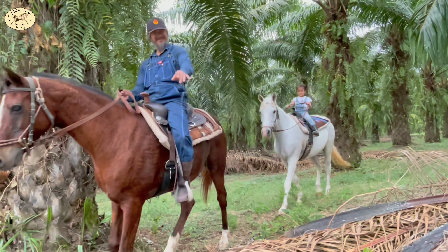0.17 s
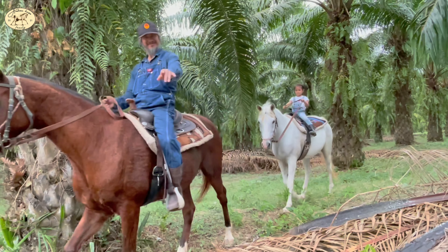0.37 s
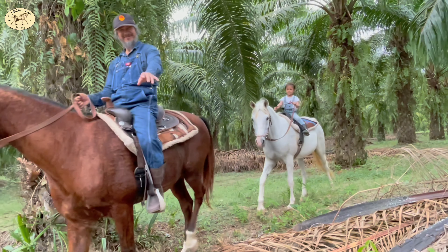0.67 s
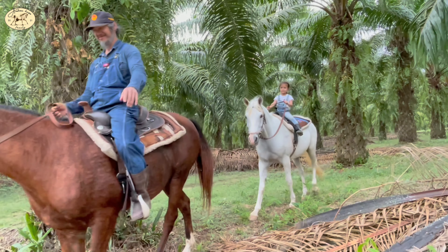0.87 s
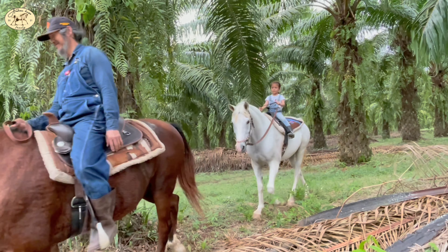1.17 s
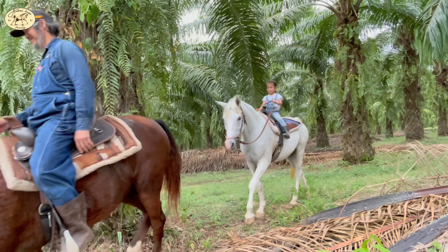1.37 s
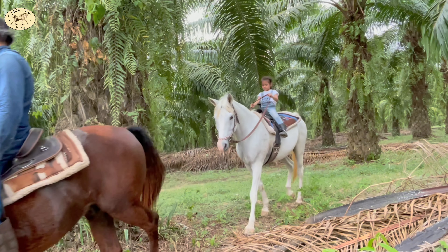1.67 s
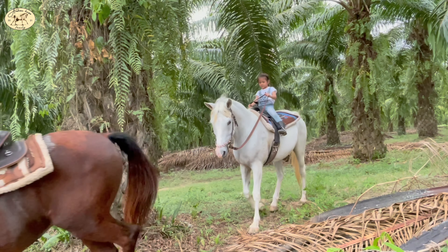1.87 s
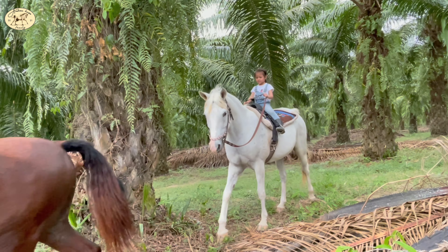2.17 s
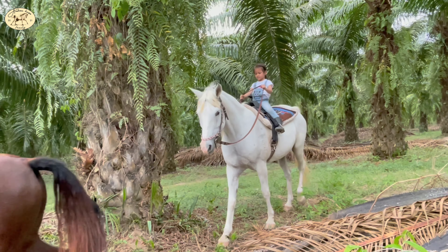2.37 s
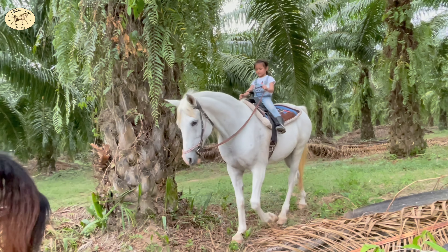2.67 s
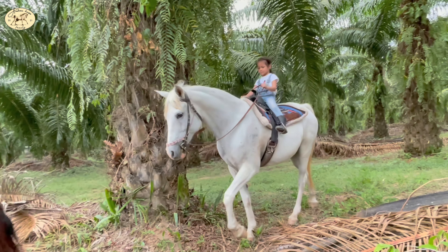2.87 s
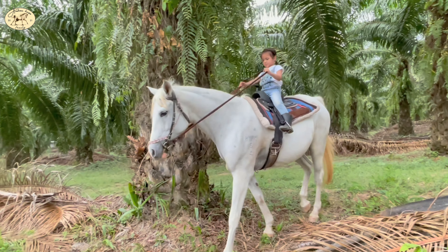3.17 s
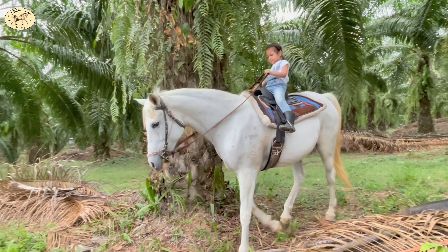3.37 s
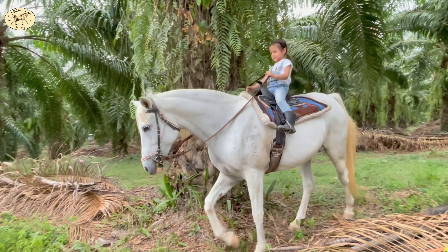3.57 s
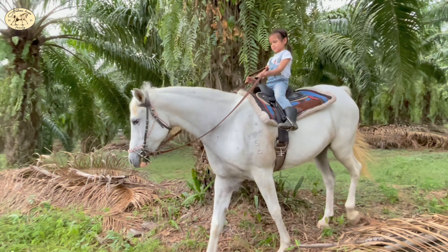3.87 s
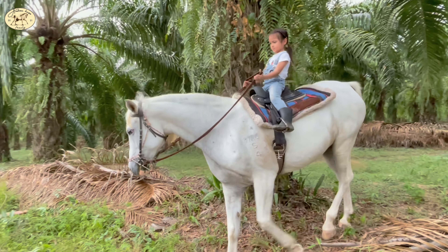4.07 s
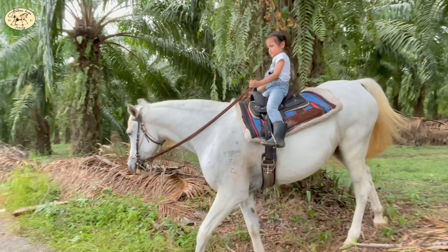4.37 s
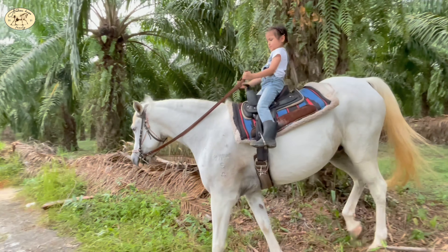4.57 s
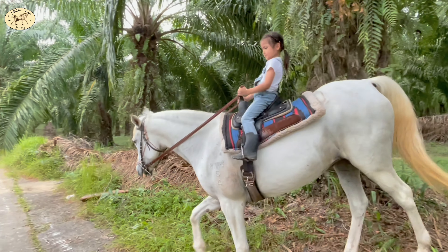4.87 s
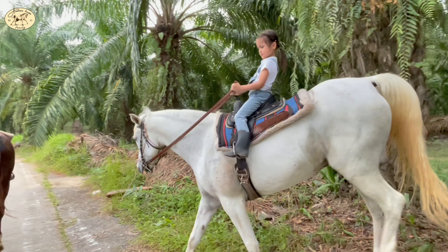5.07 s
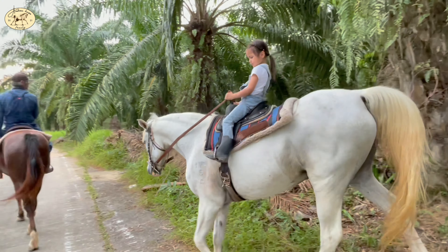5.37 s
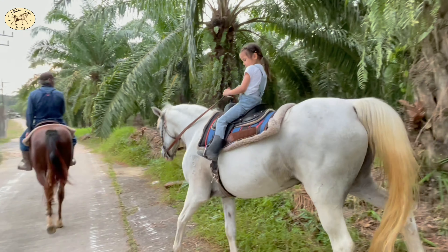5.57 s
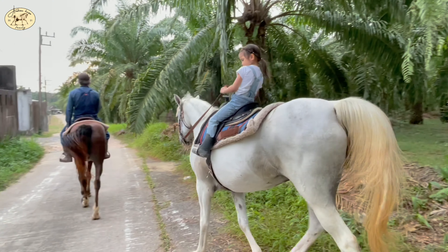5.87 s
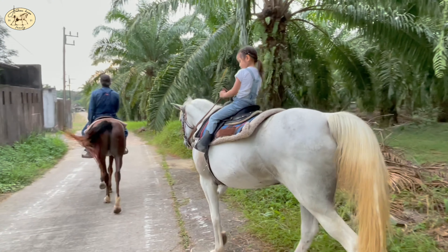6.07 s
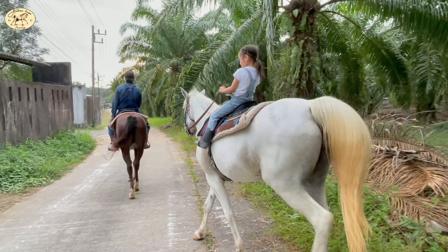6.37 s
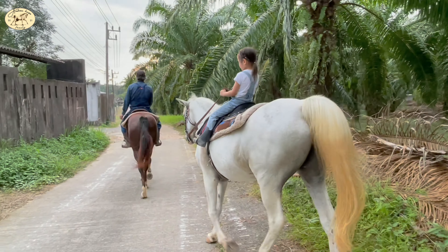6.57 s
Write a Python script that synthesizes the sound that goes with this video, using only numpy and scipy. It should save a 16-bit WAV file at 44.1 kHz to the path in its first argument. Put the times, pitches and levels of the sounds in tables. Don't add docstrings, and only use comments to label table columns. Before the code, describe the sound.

Two horses walk past close by, legs swishing through grass and snapping dry litter, then hooves clopping unevenly on a gritty paved lane.

```python
import sys
import numpy as np
from scipy import signal
from scipy.fft import rfft, irfft
from scipy.io import wavfile
from scipy.ndimage import map_coordinates

SR = 44100
rng = np.random.default_rng(int(sys.argv[2]) if len(sys.argv) > 2 else 0)


def magnitude_from_level(level_db):
    exponent = np.asarray(level_db, float) / 20
    return 10 ** exponent


def persist_wave(psi):
    counts = np.round(np.clip(psi, -1, 1) * 32767).astype(np.int16)
    wavfile.write(sys.argv[1], SR, np.atleast_2d(counts).T)


N = 296793


def rms_one(x):
    return x / np.sqrt(np.mean(x ** 2) + 1e-20)


def in_time(rows):
    s, *columns = np.transpose(rows)
    return [np.interp(np.arange(N) / SR, s, c) for c in columns]


def at_hz(points, hz):
    table_hz, table_db = np.array(points).T
    return np.interp(np.log(hz + 1), np.log(table_hz), table_db)


def colour(x, points):
    cepstrum = irfft(np.log(magnitude_from_level(at_hz(points, np.fft.rfftfreq(4096, 1 / SR)))))
    cepstrum[1:2048] *= 2
    cepstrum[2049:] = 0
    impulse = irfft(np.exp(rfft(cepstrum)))
    return signal.fftconvolve(np.atleast_2d(x), impulse[None])[:, :np.shape(x)[-1]]


def drift(rate):
    r = np.exp(-32 * np.pi * rate / SR)
    noise = rng.standard_normal(N // 16 + 3002)
    slow = signal.lfilter([1], [1, -2 * r, r * r], noise)[3000:]
    return np.interp(np.arange(N) / 16, np.arange(len(slow)), rms_one(slow))


def ring(x, hz, t60):
    r, w = magnitude_from_level(-60 / (t60 * SR)), 2 * np.pi * hz / SR
    return signal.lfilter([0, np.sin(w)], [1, -2 * r * np.cos(w), r * r], x + 1e-18)


def add(track, s, piece):
    i = int(s * SR)
    track[i:i + len(piece)] += piece[:N - i]


def touches():
    # time in seconds, sole level in dB,
    # sole pitch in Hz, wall tick in dB over sole, crack in dB over sole.
    earth_steps = [(1.937, -22.5, 594, -4.5, -3.5), (1.949, -22.5, 950, -0.5, -10),
                   (1.965, -32, 950, -5, -9), (2.596, -25, 675, -0.5, -24), (2.865, -28, 1330, -5, -4),
                   (2.872, -36, 730, 1, -7), (2.941, -42, 1260, 8, 2), (3.2, -22, 950, -5.5, -14),
                   (3.217, -29.5, 910, -7, -17), (3.227, -33, 836, 3, -1), (3.494, -20, 1080, -6.5, -17.5),
                   (3.578, -38.5, 840, 0, -1), (3.838, -32, 1010, -31, -15), (4.073, -25.5, 1190, -9, -20),
                   (4.079, -24.5, 1270, -24, -13), (4.09, -37, 1450, -4, -2), (4.1, -42, 794, -8, -15),
                   (4.123, -32, 1070, -5, -3), (4.136, -32, 1400, -8, -4), (4.176, -39, 920, -4, -12),
                   (4.194, -34.5, 716, -3, -10), (4.201, -45, 770, -3, -12), (4.433, -40, 1100, -6, -16),
                   (4.447, -32.5, 1160, -20, -20), (4.465, -33.5, 1010, -18, -19),
                   (4.473, -37, 990, -20, -19), (4.483, -43, 1030, -14, -18), (4.491, -43, 1060, -14, -18),
                   (5.057, -29, 900, 0, -1.5), (5.079, -19, 1140, -4, -12.5)]
    # time in seconds, sole level in dB, sole pitch in Hz,
    # wall tick in dB over sole.
    lane_clops = [(4.668, -30, 610, -4), (4.6726, -14.5, 1106, -8), (4.688, -32, 1070, -14),
                  (4.696, -34, 1040, -20), (5.166, -29.5, 950, -20), (5.266, -30, 710, -19),
                  (5.271, -31, 950, -5), (5.278, -25.5, 1230, -10.5), (5.294, -37, 1350, -9),
                  (5.632, -36.5, 625, -8), (5.641, -27, 930, -6), (5.655, -40, 835, -18),
                  (5.673, -39, 1200, -10), (5.752, -39, 1080, -11), (5.791, -32.5, 1020, 2),
                  (5.819, -35, 940, -6), (5.849, -41, 840, -6), (5.702, -27, 970, -8), (5.879, -31, 935, 2),
                  (5.896, -17, 1072, -5), (5.946, -29.5, 1170, 1), (5.986, -28, 960, -2),
                  (6.0, -22, 1370, 1.5), (6.004, -10, 1014, -9.5), (6.0074, -18, 950, -20),
                  (6.014, -23.5, 880, 0), (6.24, -38, 1020, -16), (6.301, -36, 940, -9),
                  (6.326, -18, 1090, -25), (6.345, -36, 976, -4), (6.379, -29, 805, -20),
                  (6.431, -38.5, 910, -4), (6.473, -34.5, 990, -10), (6.487, -36, 1000, -1),
                  (6.536, -29, 1040, -29), (6.546, -35, 1130, -15), (6.557, -36, 1040, -21),
                  (6.604, -44, 1140, -13), (6.672, -37, 1080, -8), (6.677, -29.5, 1240, -3),
                  (6.683, -27, 1060, -5.5), (6.689, -26, 950, -15), (6.695, -32.5, 1000, -6),
                  (6.322, -30, 810, -24), (6.362, -42, 1100, -22), (6.37, -43, 1150, -20),
                  (6.611, -39, 1080, -13)]
    # time in seconds, wall tick in dB, crack in dB over tick,
    # wall pitch in Hz.
    nicks = [(1.932, -32, -8, 2630), (2.182, -34.5, 1, 1940), (2.564, -23, -7, 2400),
             (2.767, -25, -9, 2930), (3.13, -38, -2, 2500), (3.299, -41, -15, 2900),
             (3.802, -34.5, -7, 2500), (3.813, -27, -10, 2390), (3.827, -28, -11, 2500),
             (3.838, -29, -4, 2530), (3.846, -38, -5, 2530), (3.897, -29, -7, 2650),
             (3.904, -31.5, -4, 2630), (3.942, -35, -3, 2100), (3.975, -28, -4.5, 2780),
             (3.992, -35, -20, 2530), (4.073, -35.5, -2, 2810), (4.121, -35, -4, 2750),
             (4.144, -58, -8, 2820), (4.439, -26, -10.5, 2600), (4.446, -27, -22, 2530),
             (4.454, -25.5, -24, 2440), (4.619, -39, -20, 2680), (4.759, -35.5, -3, 2800),
             (4.7818, -17, -6.5, 2670), (4.799, -33, -18, 2580), (4.812, -28, -12, 2500),
             (5.1628, -17, -12.5, 2160), (5.164, -19, -12.5, 2630), (5.164, -25, -13, 3430),
             (5.179, -38, -10.5, 2850), (5.217, -34, -22, 1690), (5.372, -34.5, -0.5, 2700),
             (5.636, -35, 1.5, 3830), (5.643, -23, -9.5, 2510), (5.656, -31, -18, 2320),
             (5.673, -34, -6, 2550), (5.692, -25.5, -10, 1650), (5.741, -43.5, 4, 2570),
             (5.752, -40, 4.5, 3650), (5.79, -29.5, -11, 2220), (5.818, -34.5, -9, 2470),
             (5.978, -34, -5, 2660), (6.015, -28, -17, 2680), (6.271, -42, -13, 2220),
             (6.428, -37, -13, 2310), (6.45, -42, -8, 3150), (6.475, -42, 5, 2230), (6.619, -39, 1.5, 2400),
             (6.656, -34, -4, 2500), (6.679, -22.5, -13, 1700)]
    # time in seconds, crack in dB, hoof in dB over crack.
    snaps = [(0.018, -56, -33), (0.442, -47, -20), (0.476, -42, -21), (0.668, -39.5, -3),
             (0.72, -39.5, -7.5), (0.8188, -23, -10), (0.822, -31, -13), (0.931, -32, -26),
             (0.95, -43, -12), (1.577, -56, -20), (1.66, -38.5, -7), (1.807, -43, -21), (1.974, -49, -4),
             (2.13, -34, -16), (2.136, -32.5, 3.5), (2.328, -38.5, -30), (2.766, -29, -16), (3.046, -40, 0),
             (3.292, -40, 1), (3.366, -31.5, -1.5), (4.067, -41, -4), (4.368, -40.5, -5), (4.927, -32, -25),
             (5.002, -35, -3)]
    # time in seconds, level in dB, pitch in Hz.
    chinks = [(4.439, -31, 5780), (4.452, -41, 5500), (4.457, -49, 6100), (5.975, -36, 6200),
              (6.001, -28.5, 7700), (6.004, -24, 6200), (6.015, -42, 6250), (6.326, -43, 5750),
              (6.346, -41, 6000), (6.362, -50, 5940), (6.444, -42, 8660), (6.473, -40, 8700),
              (6.63, -36.5, 6470), (6.646, -49, 4500), (6.697, -38, 7500), (4.565, -48, 3800),
              (4.494, -40, 2600), (4.457, -26, 2500), (4.082, -27, 2460), (4.117, -35, 2880),
              (4.168, -41, 2880), (4.204, -40, 2300)]
    # time in seconds, crack in dB.
    stalks = [(0.097, -62), (.155, -49), (0.213, -36.5), (0.327, -48), (0.394, -38.5), (0.428, -41),
              (.5008, -58), (0.6878, -41.5), (.7886, -46), (.884, -30.5), (0.903, -31), (.909, -32),
              (0.915, -45), (0.934, -32), (.939, -39), (6.428, -53), (6.44, -42), (6.606, -57),
              (6.611, -55)]
    wall_hz = 2550
    clop_crack_db, chink_crack_db = -33.5, -15
    nick_sole_hz, nick_sole_db = 1072, -20
    snap_sole_hz, snap_sole_db, stalk_hoof_db = 950, -6.5, -30
    return ([(s, db, hz, 0, wall, crack, wall_hz) for s, db, hz, wall, crack in earth_steps]
            + [(s, db, hz, 0, wall, clop_crack_db, wall_hz) for s, db, hz, wall in lane_clops]
            + [(s, db, nick_sole_hz, nick_sole_db, 0, crack, hz) for s, db, crack, hz in nicks]
            + [(s, db, snap_sole_hz, hoof + snap_sole_db, hoof, 0, wall_hz) for s, db, hoof in snaps]
            + [(s, db, nick_sole_hz, nick_sole_db, 0, chink_crack_db, hz) for s, db, hz in chinks]
            + [(s, db, snap_sole_hz, stalk_hoof_db, stalk_hoof_db, 0, wall_hz) for s, db in stalks])


def contacts(rows, paved_t60):
    # frequency in Hz, density in dB per Hz.
    crack_colour = [(200, -14), (1500, -2), (2600, 3), (4000, 1), (6000, 3), (9000, 1), (11600, 3),
                    (13000, -6)]
    soft_t60, paved_from_s = .011, 4.6
    rubble_db, rubble_t60 = -4, 0.056
    wall_t60, wall_yield_s = 0.0061, 0.003
    hollow, ticks, cracks = np.zeros(N), np.zeros(N), np.zeros((2, N))
    t = np.arange(int(.07 * SR)) / SR
    grit = rng.standard_normal((len(rows), 3, len(t)))
    burst = (1 - np.exp(-t / .001)) * (magnitude_from_level(-60 * t / .012) + .12 * magnitude_from_level(-60 * t / .05))
    for row, (touch, snap, other) in zip(rows, grit):
        s, peak_db, hz, hollow_db, edge_db, crack_db, wall_hz = row
        blow = .08 * touch * magnitude_from_level(-60 * t / .02)
        blow[0] += 1
        t60 = paved_t60 if s > paved_from_s else soft_t60
        soft = ring(blow, hz, 0.79 * t60) * 0.79 / np.sqrt(t60) * hz / SR
        sole = ring(soft, hz, t60)
        sole = sole + 0.77 * ring(blow, 1.465 * hz, 0.0093) + 0.29 * ring(soft, 0.76 * hz, 0.0039)
        rubble = rms_one(ring(other, 1116, 0.0063) + ring(touch, 2280, 0.0013))
        rubble = rubble * (1 - np.exp(-t / 0.0031)) * magnitude_from_level(rubble_db - 60 * t / rubble_t60)
        add(hollow, s, magnitude_from_level(peak_db + hollow_db - 1.0) * (sole + rubble))
        wall_hz = wall_hz * (1 + .025 * np.clip(snap[-1], -2, 2))
        wall = ring(ring(blow, wall_hz, wall_yield_s), wall_hz, wall_t60) * 2.4 * wall_hz / SR
        wall = wall + 0.67 * ring(blow, 1.3 * wall_hz, 0.0011)
        add(ticks, s - .0005, magnitude_from_level(peak_db + edge_db + 7.0) * wall)
        add(cracks[0], s, magnitude_from_level(peak_db + crack_db + 11.0) * snap * burst)
        add(cracks[1], s, magnitude_from_level(peak_db + crack_db + 14.5) * (.5 * snap + .87 * other) * burst)
    no_bass = signal.butter(2, 200, "high", fs=SR, output="sos")
    return signal.sosfilt(no_bass, hollow + 1e-18), ticks, colour(cracks, crack_colour)


def echoes(x, t60):
    t = np.arange(int(.25 * SR)) / SR
    sparse = rng.random((2, len(t))) < 600 / SR
    tail = rng.standard_normal((2, len(t))) * (sparse + .03)
    tail = tail * magnitude_from_level(-60 * t / t60) * (t > .009)
    return signal.fftconvolve(x[None], tail / np.sqrt(np.sum(tail ** 2, axis=1, keepdims=True)))[:, :N]


def placed(x, bearing):
    late, pan_db = in_time(bearing)
    right = map_coordinates(x, [np.arange(N) - late], order=3, mode="nearest")
    return np.array([x * magnitude_from_level(pan_db / 2), right * magnitude_from_level(-pan_db / 2)])


def hooves(rows, bearing, paved_t60, echo_db):
    hollow, ticks, cracks = contacts(rows, paved_t60)
    direct = placed(hollow + ticks, bearing)
    around = cracks * magnitude_from_level(np.outer([.5, -.5], in_time(bearing)[1]))
    scatter = echoes(hollow, 0.12) + magnitude_from_level(2.5) * echoes(ticks + cracks[0], 0.13)
    return direct + around + magnitude_from_level(echo_db) * scatter


def thuds():
    # time in seconds, peak level in dB, knock pitch in Hz,
    # boom pitch in Hz, boom level in dB.
    landings = [(0.989, -41, 288, 75, -16), (1.938, -17, 347, 152.5, -20), (1.95, -21, 252, 101.6, -15),
                (2.14, -42.5, 215, 104, -10.5), (2.583, -30, 239, 154.6, -13), (2.765, -27, 296, 174, -44),
                (2.866, -25.5, 482, 168, -18), (2.925, -44, 226, 164, -17), (3.129, -39.5, 232, 112, -24),
                (3.368, -37.5, 280, 91, -36), (3.485, -28.5, 482, 139, -19.5),
                (4.071, -31.5, 473, 94.2, -39), (4.432, -35.5, 444, 137, -15), (4.45, -31, 294, 144, -17.5),
                (4.661, -29, 510, 162, -23.5), (5.052, -32.5, 440, 81, -10.5),
                (5.059, -25.5, 222, 137.6, -16), (5.078, -23.5, 414, 124, -18.5),
                (5.276, -38.5, 223, 124, -3), (5.643, -35.5, 225, 172, -14), (5.681, -30, 314, 131, -10.5),
                (5.885, -37.5, 353, 153, -17), (5.998, -16.5, 449, 108, -21),
                (6.014, -29, 250, 150.5, -9.5), (6.252, -43, 366, 164, -9.5), (6.326, -24.5, 312, 179, -25),
                (6.431, -38.5, 243, 114, -7.5), (6.686, -31, 205, 124, -8)]
    out, t = np.zeros(N), np.arange(int(.22 * SR)) / SR
    lumps = rng.standard_normal((len(landings), 2, len(t)))
    for (s, peak_db, knock_hz, boom_hz, boom_db), (a, b) in zip(landings, lumps):
        turns = np.cumsum(knock_hz * (0.661 + 0.752 * np.exp(-t / 0.00848))) / SR
        knock = (1 - np.exp(-t / 0.0062)) * magnitude_from_level(-60 * t / 0.049) * np.sin(2 * np.pi * turns)
        knock += 0.25 * rms_one(ring(a, knock_hz, 0.0051)) * magnitude_from_level(-60 * t / 0.07)
        turns = np.cumsum(boom_hz * (1 + 1.0 * np.exp(-t / 0.00883))) / SR
        boom = np.sin(2 * np.pi * turns) + 0.35 * rms_one(ring(b, 1.07 * boom_hz, 0.009))
        boom *= (1 - np.exp(-t / 0.012)) ** 2 * magnitude_from_level(-60 * t / 0.095)
        add(out, s - .002, magnitude_from_level(peak_db) * (3.02 * knock + magnitude_from_level(boom_db + 27.0) * boom))
    return signal.sosfilt(signal.butter(4, 64, "high", fs=SR, output="sos"), out)


def ground_rumble():
    # time in seconds, level in dB.
    rumble = [(0.0, -50.5), (4.55, -56.5), (5.21, -55), (5.45, -55.5), (5.77, -59), (6.62, -49.5),
              (6.73, -37)]
    # frequency in Hz, density in dB per Hz.
    tread = [(25, -0.5), (45, -7.5), (85, 1.5), (150, -8), (260, -12.5), (500, -39)]
    return magnitude_from_level(in_time(rumble)[0]) * rms_one(colour(rng.standard_normal(N), tread)[0])


def legs():
    # time of the peak in seconds, swish level in dB,
    # rise in seconds, fall in seconds, grit scuff in dB over swish.
    grass_sweeps = [(.17, -35, 0.46, 0.11, -13.5), (.44, -36, 0.41, 0.75, -19),
                    (.905, -24.5, 0.083, 0.17, -15), (1.25, -37, 0.55, 0.21, -14.5),
                    (1.555, -30.5, 0.14, 0.15, -17), (1.84, -25.5, 0.16, 0.22, -18),
                    (2.14, -32.5, 0.0066, 0.22, -10.5), (2.42, -32, 0.46, 0.25, -18.5),
                    (2.64, -38, 0.074, 0.23, -8), (2.775, -24.5, 0.01, 0.014, -13),
                    (2.875, -33, 0.025, 0.0064, -16), (2.94, -31, 0.031, 0.061, -8),
                    (3.05, -36.5, 0.13, 0.48, -14), (3.22, -50.5, 0.028, 0.17, 10),
                    (3.375, -42, 0.024, 0.57, -8.5), (3.7, -41, 0.57, 0.12, -26)]
    # time of the peak in seconds,
    # swish level in dB, rise in seconds, fall in seconds, grit scuff in dB over swish.
    verge_sweeps = [(3.86, -37, 0.41, 1, -6.5), (4.11, -30.5, 0.043, 0.089, -5.5),
                    (4.45, -35.5, 0.057, 0.18, -14), (4.78, -37.5, 1, 1, -4.5),
                    (5.0, -32, 0.076, 0.25, -10.5), (5.22, -36.5, 0.29, 0.38, -14),
                    (5.54, -44, 0.017, 0.093, -27), (5.645, -58, 0.0046, 0.13, 6),
                    (5.71, -45.5, 0.045, 0.047, 10.5), (5.79, -33, 0.14, 0.2, -12.5),
                    (5.91, -49, 0.048, 0.039, 15.5), (6.005, -31.5, 0.074, 0.068, -5),
                    (6.25, -36.5, 0.15, 1, -9.5), (6.46, -36, 0.026, 0.089, -6),
                    (6.55, -61, 0.12, 0.026, 24.5), (6.68, -41, 0.026, 0.036, 9.5)]
    grass_crunch_db, verge_crunch_db = -8.5, -3.5
    drop_db = 15
    rest_db, rest_fade_db_per_s = (-78, -54, -79), 1.3
    t = np.arange(N) / SR
    power = magnitude_from_level(np.array(rest_db)[:, None] - rest_fade_db_per_s * t) ** 2
    for sweeps, crunch_db in ((grass_sweeps, grass_crunch_db), (verge_sweeps, verge_crunch_db)):
        for s, db, rise, fall, scuff_db in sweeps:
            swell = magnitude_from_level(db - drop_db * np.maximum((s - t) / rise, (t - s) / fall))
            power = power + (swell * magnitude_from_level(np.array([[0], [crunch_db], [scuff_db]]))) ** 2
    return 10 * np.log10(power)


def rustle(level_db, spectrum, per_s, spread_db, lumpy_db, grain_db):
    clumps = magnitude_from_level(lumpy_db * drift(40))
    born = rng.random((3, N)) < per_s * clumps / SR
    heights = magnitude_from_level(spread_db * np.minimum(rng.exponential(1, (3, N)), 5))
    snaps = born * heights * rng.choice([-1, 1], (3, N))
    hiss = rms_one(clumps * rng.standard_normal((3, N)))
    rest, patchy = hiss + magnitude_from_level(grain_db) * rms_one(snaps), 0
    for hz in (1500, 3200, 5000, 8500):
        low = signal.sosfilt(signal.butter(1, hz, fs=SR, output="sos"), rest)
        rest = rest - low
        patchy = patchy + low * magnitude_from_level(2.2 * drift(9))
    return magnitude_from_level(level_db) * rms_one(colour(patchy + rest, spectrum))


def undergrowth():
    # frequency in Hz, density in dB per Hz.
    swish_colour = [(1200, -35.5), (2500, -14.5), (4200, -15), (5900, -9.5), (7500, -11.5), (9300, -10),
                    (10600, -21.5), (11600, -4.5), (12500, -10.5)]
    crunch_colour = [(700, -29), (1500, -6), (2000, 15), (2550, 15), (3200, 8), (4200, -0.5), (6000, 11)]
    scuff_colour = [(150, -1), (350, -4.5), (700, -6), (1050, 1), (1500, -1.5), (2000, -1), (3000, -46)]
    swish_db, crunch_db, scuff_db = legs()
    swish = rustle(swish_db, swish_colour, per_s=3500, spread_db=4.0, lumpy_db=2.3, grain_db=-1.5)
    crunch = rustle(crunch_db, crunch_colour, per_s=900, spread_db=4.0, lumpy_db=2.5, grain_db=1.5)
    scuff = rustle(scuff_db, scuff_colour, per_s=600, spread_db=4.5, lumpy_db=3.0, grain_db=3.0)
    shared = .68 * swish[0] + .65 * crunch[0] + .75 * scuff[0]
    spread = .75 * swish[1:] + .75 * crunch[1:] + .65 * scuff[1:]
    return shared, spread


def bird():
    length_s, start_hz, end_hz, settle_s = 0.067, 6600, 5700, .014
    out, t = np.zeros(N), np.arange(int(length_s * SR)) / SR
    hz = end_hz + (start_hz - end_hz) * np.exp(-t / settle_s)
    whistle = np.sqrt(np.sin(np.pi * t / length_s)) * np.sin(2 * np.pi * np.cumsum(hz) / SR)
    add(out, 3.078, magnitude_from_level(-54) * whistle)
    return out


def grove():
    # frequency in Hz, density in dB per Hz.
    grove_colour = [(24, -17), (40, 17), (262, -5), (360, 4.5), (567, 0.5), (1050, -2), (1120, 1.5),
                    (1760, -7.5), (3550, -2.5), (9000, -39), (11700, -45), (19800, -120)]
    # frequency in Hz, likeness of left and right from 0 to 1.
    likeness = [(40, 0.97), (250, 0.51), (700, 0.49), (2000, 0.014), (9000, 0.024)]
    mid, side = rng.standard_normal((2, N))
    hz = np.array(likeness)[:, 0]
    alike = np.clip(np.array(likeness)[:, 1], 0, .99)
    mid = colour(mid, np.c_[hz, 10 * np.log10(1 + alike)])[0]
    side = colour(side, np.c_[hz, 10 * np.log10(1 - alike)])[0]
    return magnitude_from_level(-54 + 1.5 * drift(6)) * rms_one(colour([mid + side, mid - side], grove_colour))


def scene():
    # time in seconds, delay of the right port in
    # samples, left over right in dB.
    leader_bearing = [(0, 6.1, .4), (1.2, 5, 1.1), (1.95, 13, 2.5), (2.85, 11, 1.2), (3.2, 17, 2),
                      (4.67, 14, 4), (5.64, 12, 3), (5.9, 9, 2.5), (6.73, 7, 2)]
    # time in seconds,
    # delay of the right port in samples, left over right in dB.
    follower_bearing = [(0, 6, 0), (5.08, 5, 0), (5.7, 3, 1), (5.8, -2, 0), (6.0, -4, -1.5), (6.35, 2, 0),
                        (6.73, -4, -1)]
    # start in seconds, end in seconds.
    follower_steps = [
        (5.05, 5.1),
        (5.25, 5.31),
        (5.67, 5.83),
        (5.98, 6.05),
        (6.2, 6.5),
        (6.6, 6.73),
    ]
    # time in seconds, share of the brightest sound
    dulling = [(0, 1), (6.42, 1), (6.52, .3), (6.73, .2)]
    shared, spread = undergrowth()
    near = placed(thuds() + ground_rumble() + shared, leader_bearing)
    follower = [row for row in touches() if any(a <= row[0] < b for a, b in follower_steps)]
    leader = [row for row in touches() if row not in follower]
    feet = near + spread + hooves(leader, leader_bearing, paved_t60=.013, echo_db=-11.5)
    feet = feet + hooves(follower, follower_bearing, paved_t60=.007, echo_db=-11.0)
    dull = signal.sosfilt(signal.butter(6, 9800, fs=SR, output="sos"), feet)
    return dull + in_time(dulling)[0] * (feet - dull) + grove() + bird()


def band_limit(x):
    return signal.sosfilt(signal.butter(12, 16000, fs=SR, output="sos"), x)


def record(dry):
    # frequency in Hz, gain in dB.
    port_sum = [(20, -25), (60, 0), (9700, 0), (9900, -20), (10300, -20), (10550, 3), (12400, 3.5),
                (13000, -19)]
    # frequency in Hz, gain in dB.
    port_top = [(20, 0), (14200, 0), (14800, 8), (15650, 7), (15950, -30)]
    # frequency in Hz, gain in dB.
    port_difference = [(20, -25), (60, 0), (9200, -1), (10500, 11), (11300, 2), (11750, -1), (11950, -11),
                       (13600, -15), (15000, -45)]
    left, right = np.tanh(dry)
    mid = colour(colour((left + right) / 2, port_sum), port_top)[0]
    side = colour((left - right) / 2, port_difference)[0]
    return band_limit(np.array([mid + side, mid - side]))


dry = scene()
out = record(dry)
persist_wave(out)
```